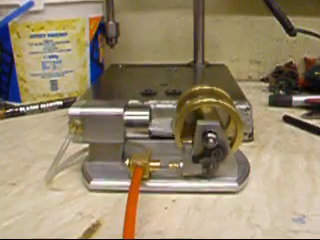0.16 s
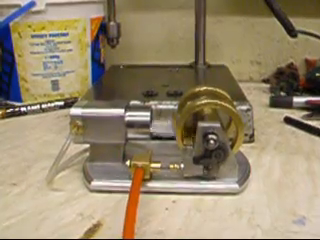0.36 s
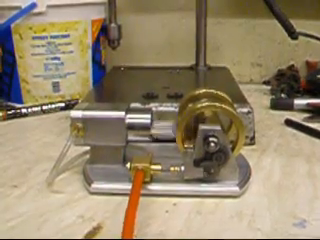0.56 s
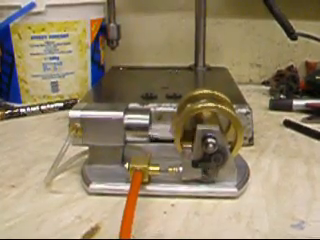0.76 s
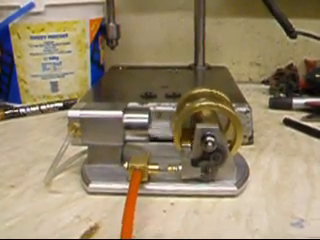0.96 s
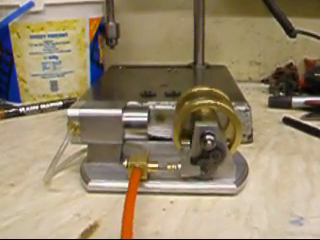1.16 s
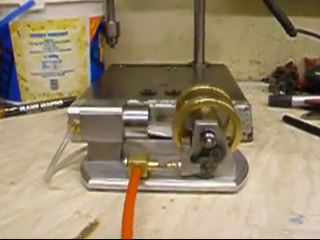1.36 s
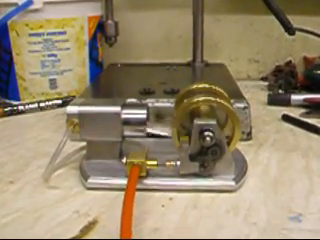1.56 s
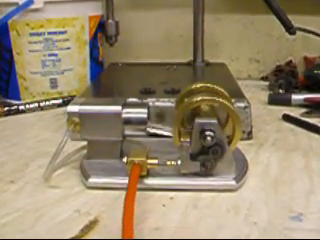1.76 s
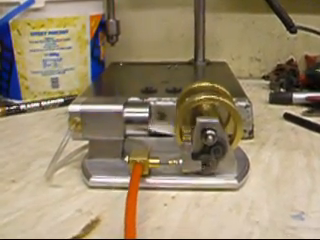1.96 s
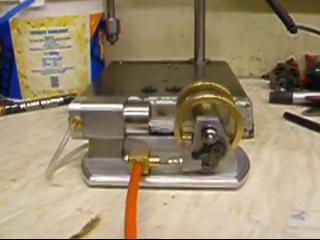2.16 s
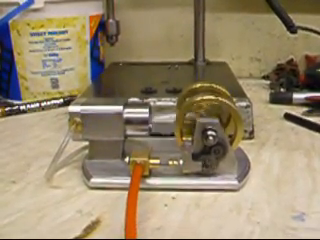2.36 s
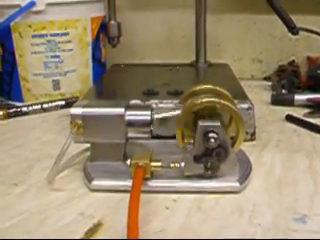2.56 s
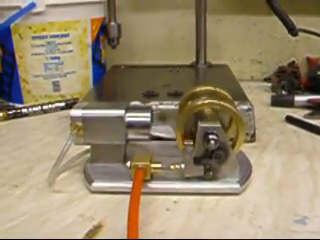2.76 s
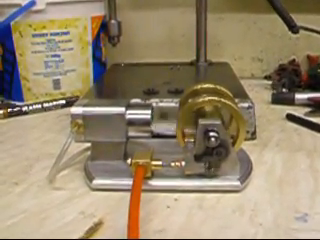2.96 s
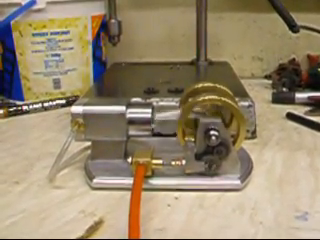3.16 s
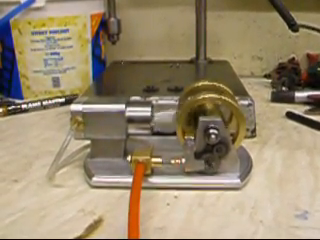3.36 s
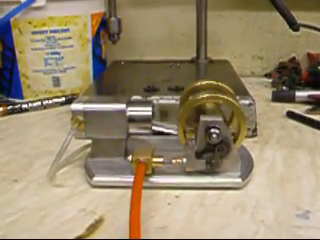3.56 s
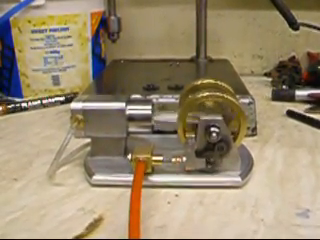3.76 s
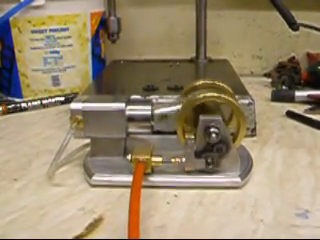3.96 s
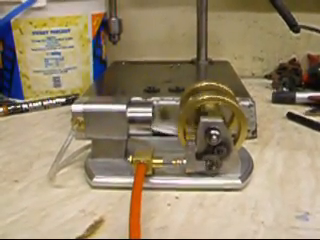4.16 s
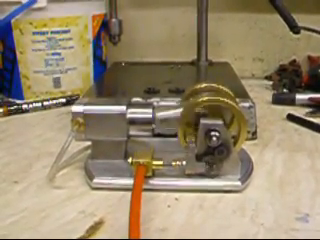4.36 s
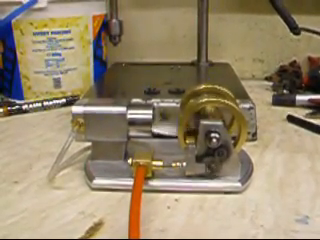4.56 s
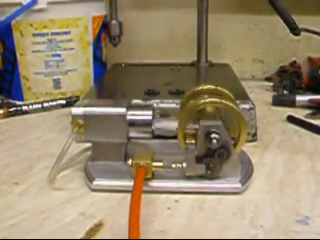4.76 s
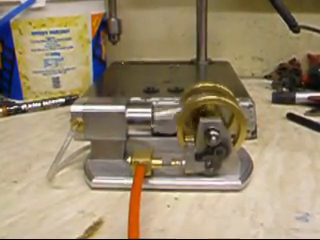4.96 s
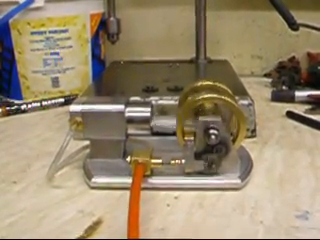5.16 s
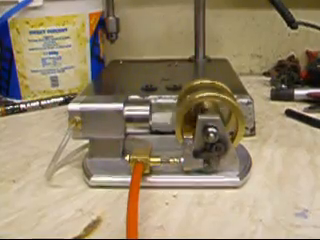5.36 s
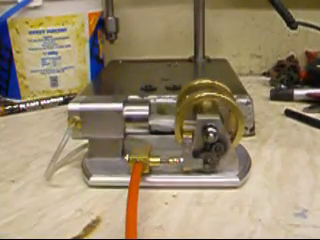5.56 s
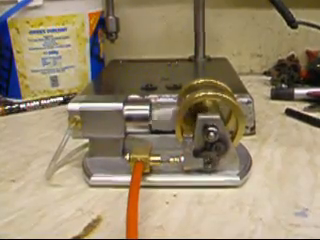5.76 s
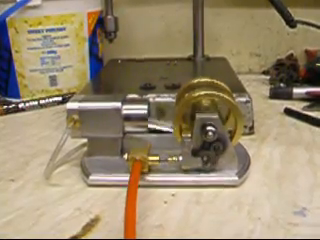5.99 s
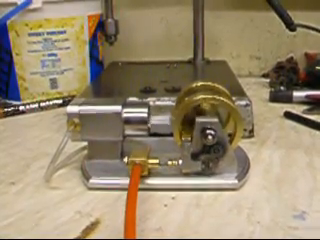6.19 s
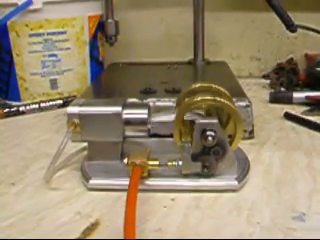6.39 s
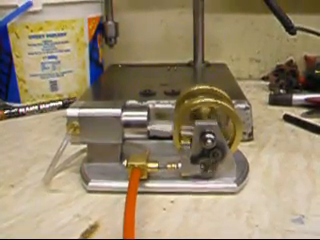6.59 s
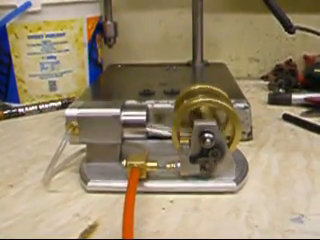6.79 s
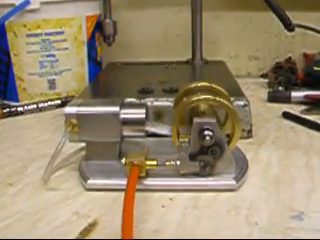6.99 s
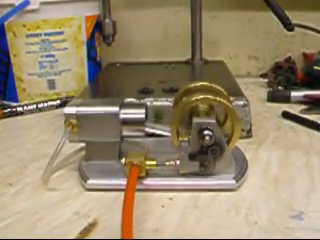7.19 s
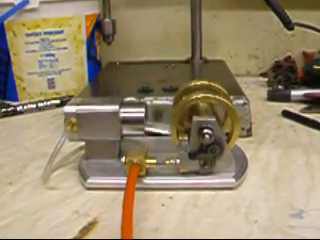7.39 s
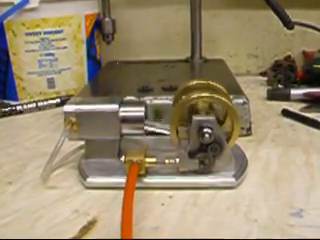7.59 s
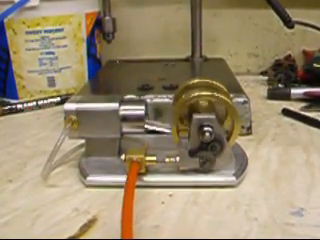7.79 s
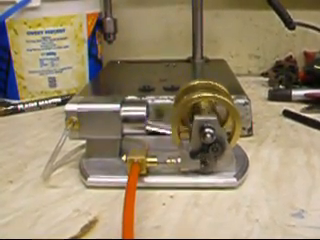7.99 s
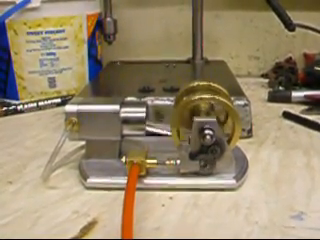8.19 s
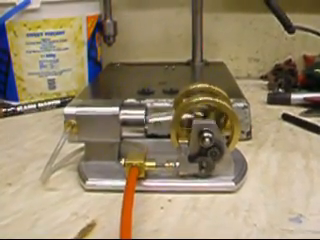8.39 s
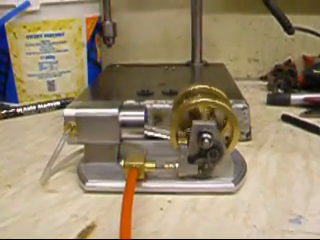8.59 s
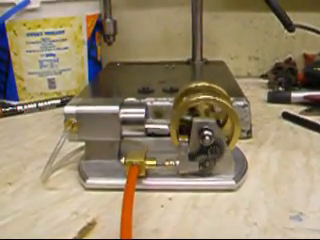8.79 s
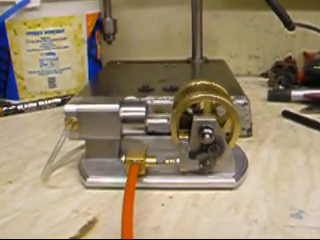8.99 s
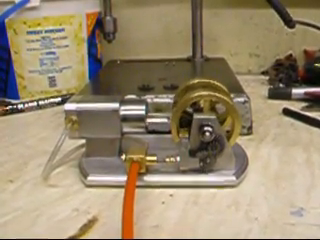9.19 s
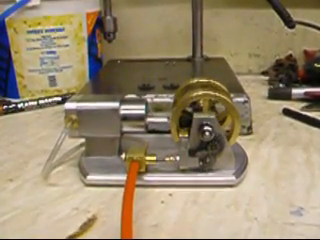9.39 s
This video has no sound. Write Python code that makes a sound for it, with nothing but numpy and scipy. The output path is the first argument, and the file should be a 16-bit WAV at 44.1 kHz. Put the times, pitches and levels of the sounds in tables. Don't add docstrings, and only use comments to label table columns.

```python
import sys
import numpy as np
from scipy import signal
from scipy.fft import rfft, irfft
from scipy.io import wavfile
from scipy.ndimage import uniform_filter1d, map_coordinates

SR = 44100
rng = np.random.default_rng(int(sys.argv[2]) if len(sys.argv) > 2 else 0)


def generate_wav(sig):
    pcm = np.round(np.clip(np.atleast_2d(sig).T, -1, 1) * 32767).astype(np.int16)
    wavfile.write(sys.argv[1], SR, pcm)


def decibels_to_gain(level_db):
    exponent = np.asarray(level_db, float) / 20
    return 10 ** exponent


N = 416304

# port_opens_s, burst_db, jet_db, sag_db (over the stroke)
RUNNING_STROKES = [(0.084, -18, -26.5, 9), (0.283, -21, -24, 5.5), (0.4822, -19, -24.5, 7.5),
                   (0.6819, -18.5, -24, 0), (0.8834, -19.5, -25.5, 6), (1.084, -19.5, -21, 3.5),
                   (1.2895, -17, -23.5, 6), (1.4959, -18.5, -22.5, 4.5), (1.6977, -14.5, -24, 4),
                   (1.9066, -15.5, -22.5, 4), (2.1166, -16, -28, 9.5), (2.3343, -19, -22.5, 2.5),
                   (2.5532, -19.5, -23, 3.5), (2.7858, -17, -24.5, 4), (3.0145, -17.5, -24, 3),
                   (3.2424, -18, -22, 1.5), (3.4734, -19, -23.5, 2), (3.7147, -17.5, -23.5, 4.5)]
# port_opens_s, burst_db, jet_db, sag_db
SLOWING_STROKES = [(3.951, -19.5, -24, 3.5), (4.202, -17, -24, 5.5), (4.4468, -19.5, -24, 3.5),
                   (4.6997, -20, -23.5, 2), (4.951, -18, -23.5, 8), (5.2141, -19, -23.5, 0.5),
                   (5.4785, -18.5, -23, 8), (5.7535, -17, -22, 2.5), (6.0188, -17, -24.5, 4),
                   (6.3156, -22.5, -23.5, 2), (6.6313, -17, -25, 2), (7.0083, -19, -23, 1),
                   (7.383, -17, -25.5, 4), (7.7915, -21, -22.5, 3), (8.171, -15.5, -26, 7.5)]
# time_s, level_db
SUPPLY_PRESSURE = [
    (0, 1.5),
    (2.5, -1),
    (5, -5),
    (6.5, -7),
    (8.4, -16.5),
]
# centre_hz, width_hz, boost_db
LEAK_RESONANCES = [(2200, 310, 2), (3465, 100, 8), (3830, 110, 7.5), (4495, 320, 7), (5610, 220, 2),
                   (5930, 250, 2.5)]


def unit(x):
    return x / np.sqrt(np.mean(x ** 2) + 1e-20)


def along(points, hz):
    f, v = np.transpose(points)
    return np.interp(np.log(hz + 1), np.log(f + 1), v)


def wobble(rate):
    knots = rng.standard_normal(int(N * rate / SR) + 4)
    return map_coordinates(knots, [np.arange(N) * rate / SR])


def bumps(modes, hz):
    return decibels_to_gain(sum(db / (1 + (2 * (hz - centre) / width) ** 2) for centre, width, db in modes))


def coloured(x, gain):
    size = 8192
    cepstrum = irfft(np.log(gain(np.fft.rfftfreq(size, 1 / SR)) + 1e-6), size)
    cepstrum[1:size // 2] *= 2
    cepstrum[size // 2 + 1:] = 0
    response = irfft(np.exp(rfft(cepstrum)), size)[:size // 2]
    return signal.fftconvolve(x, response / np.linalg.norm(response))[:len(x)]


def patchy(x, depth_db, size):
    z = signal.stft(x, nperseg=256)[2]
    field = uniform_filter1d(rng.standard_normal(z.shape), size=4, axis=0)
    field = uniform_filter1d(field, size=size, axis=1)
    return signal.istft(z * decibels_to_gain(depth_db * unit(field)), nperseg=256)[1][:N]


def strokes():
    opens, *levels_db = np.transpose(RUNNING_STROKES + SLOWING_STROKES)
    turn_s = np.diff(opens, prepend=2 * opens[0] - opens[1])
    open_s = .018 + .14 * turn_s
    return opens, open_s, *levels_db


def crank():
    opens = strokes()[0]
    opens = np.r_[2 * opens[0] - opens[1], opens, opens[-1] + .42]
    return np.interp(np.arange(N) / SR, opens, np.arange(len(opens)), right=.7)


def hiss():
    # pitch_hz, level_db (per Hz)
    hiss_colour = [(18, -22), (30, -1.5), (50, -9), (200, -10.5), (400, -10.5), (900, -11), (1500, -11.5),
                   (3000, -11), (5000, -13.5), (7000, -15.5), (8000, -14), (9500, -21.5), (11500, -25.5),
                   (13300, -32)]
    # pitch_hz, level_db
    mains_hum = [
        (60, -76),
        (180, -73.5),
    ]
    level_db = -50.5 + .4 * wobble(1.17) + 0.41 * wobble(7.1)
    air = coloured(rng.standard_normal(N),
                   lambda hz: decibels_to_gain(along(hiss_colour, hz)) * bumps(LEAK_RESONANCES, hz) ** 0.92)
    hum = sum(decibels_to_gain(db) * np.sin(2 * np.pi * hz * np.arange(N) / SR) for hz, db in mains_hum)
    return decibels_to_gain(level_db) * air + hum


def seepage():
    # pitch_hz, level_db (per Hz)
    seep_colour = [(300, -37), (1000, -11), (2000, -8.5), (3500, -5), (4600, -8.5), (6000, -9), (8000, -8),
                   (11000, -18.5), (13400, -20)]
    # crank_turn (0-1 from port opening), width_turns, level_db
    valve_leaks = [
        (.1, .12, -32),
        (.35, 0.042, -42.5),
        (.495, 0.033, -48.5),
        (.58, 0.066, -51),
        (.84, 0.058, -46),
        (.97, 0.019, -47.5),
    ]
    turn = crank() % 1
    leak = sum(decibels_to_gain(db - 5.9 * ((turn - at) / width) ** 2) for at, width, db in valve_leaks)
    pressure_db = np.interp(np.arange(N) / SR, *np.transpose(SUPPLY_PRESSURE))
    flutter_db = 1.6 * wobble(9.6) + 0.52 * wobble(60) + 1.4 * wobble(300)
    air = leak * decibels_to_gain(pressure_db + flutter_db) * rng.standard_normal(N)
    air = coloured(air, lambda hz: decibels_to_gain(along(seep_colour, hz)) * bumps(LEAK_RESONANCES, hz) ** 1.23)
    return patchy(air, depth_db=1.5, size=14)


def exhaust():
    # pitch_hz, level_db (per Hz)
    jet_colour = [(90, -31), (250, -28), (600, -15), (1100, -13), (1450, -22.5), (2000, -8), (3300, -2),
                  (4100, -12), (6300, -13.5), (8000, -15.5), (10000, -21.5), (11800, -27.5), (12800, -23),
                  (13400, -28)]
    # centre_hz, width_hz, boost_db
    body_modes = [(150, 30, 10), (311, 33, 7), (550, 33, -13), (588, 33, -11), (688, 35, -8), (995, 35, -8),
                  (1670, 70, 3.5), (1895, 58, -5), (2168, 40, -8.5), (2365, 110, -7.5), (2455, 35, -7),
                  (2685, 38, -8), (2775, 35, -8.7), (2930, 60, -11), (3330, 42, -9), (3570, 190, 3.2),
                  (4012, 35, -9.5), (4165, 42, -11.5), (4325, 40, -6.2), (4775, 36, -8), (5030, 100, -9.5),
                  (5192, 60, -6), (5960, 95, -5), (6290, 200, 4.5), (7795, 60, -7), (8215, 58, -7),
                  (9670, 260, 3.5), (10950, 100, -8), (11850, 70, -8), (13050, 35, -8.9)]
    # centre_hz, width_hz, boost_db
    hose_modes = [(150, 21, 14), (334, 104, 9), (469, 55, 13), (629.6, 32, 16)]
    gate, flow = np.zeros(N), np.zeros(N)
    t = np.arange(-SR // 20, SR // 5) / SR
    luck = rng.standard_normal((len(RUNNING_STROKES + SLOWING_STROKES), 4))
    for s, length, blow_db, jet_db, sag_db, (*surge, puff) in zip(*strokes(), luck):
        surge_db = 0.5 * (surge - np.mean(surge))
        early_db, middle_db, late_db = jet_db + sag_db * np.array([.45, -.1, -.55]) + surge_db
        level_db = np.interp(t, [.004, .009, length * 0.28, length * 0.35, length * 1.04],
                             [blow_db - 1.5, early_db + 0.69, early_db, middle_db, late_db])
        crack = np.clip((t - .0013) / .0014, 0, 1) ** 1.5
        lead_in = decibels_to_gain(-20.5 + 1600 * np.minimum(t, 0)) * (t < .002)
        closing = decibels_to_gain(-1600 * np.maximum(t - length + 0.0056, 0))
        start = round(s * SR) - SR // 20
        gate[start:][:len(t)] += decibels_to_gain(level_db) * (crack + lead_in) * closing
        push = np.clip(t / (length * 0.65), 0, 1) ** 0.33 * closing
        hose_db = -49 + 1.5 * puff
        flow[start:][:len(t)] += decibels_to_gain(hose_db + 0.2) * push

    shocks = decibels_to_gain(3.75 * np.minimum(wobble(2500), 1.6))

    def torn_air(grip):
        return unit(shocks ** grip * decibels_to_gain(1.54 * wobble(240)) * rng.standard_normal(N))

    def roar_share(hz):
        return 1 / (1 + (hz / 4300) ** 6)

    def colour(hz):
        return decibels_to_gain(along(jet_colour, hz)) * bumps(body_modes, hz) ** 1.17 / (1 + (450 / (hz + 1)) ** 3)

    roar = coloured(gate * torn_air(1.05), lambda hz: colour(hz) * np.sqrt(roar_share(hz)))
    fizz = coloured(gate * torn_air(.7), lambda hz: colour(hz) * np.sqrt(1 - roar_share(hz)))
    hose = coloured(flow * rng.standard_normal(N),
                    lambda hz: bumps(hose_modes, hz) * hz / (hz + 150) / (1 + (hz / 600) ** 4))
    jet = patchy(decibels_to_gain(-0.92) * roar + decibels_to_gain(-7.0) * fizz, depth_db=2.0, size=6)
    return jet + hose, gate


def ring(modes, rise, scatter_db):
    t = np.arange(SR // 20) / SR
    luck = rng.standard_normal((len(modes), 2))
    tones = np.zeros(len(t))
    for (hz, db, t60), (strength, detune) in zip(modes, luck):
        decay = decibels_to_gain(db + scatter_db * strength - 60 * t / t60)
        tones += decay * np.sin(2 * np.pi * hz * (1 + 0.011 * detune) * t)
    return tones * (1 - np.exp(-(t / rise) ** 2))


def valve():
    # pitch_hz, level_db, t60_s
    pop_modes = [(1128, -22.5, 0.035), (2000, -0.5, 0.0094), (2910, 2.5, 0.0076), (3543, -1, 0.018),
                 (4700, -15.5, 0.042), (5390, -12.5, 0.015), (6340, -15, 0.031), (10000, -28, .02),
                 (10540, -34, 0.013), (12500, -22, .015)]
    # pitch_hz, level_db, t60_s
    seat_modes = [(2320, -3, 0.016), (1840, -6.5, 0.019), (3470, -26, 0.013)]
    out = np.zeros(N)
    for s, length, blow_db, jet_db, sag_db in zip(*strokes()):
        burst = round((s + .0008) * SR)
        pop = ring(pop_modes, rise=0.00075, scatter_db=2.0)
        out[burst:][:SR // 20] += decibels_to_gain(blow_db + 3.0) * pop
        shut = round((s + 1.12 * length - .007) * SR)
        tap_db = jet_db - 0.33 * sag_db + 2 + 120 * (length - 0.1)
        out[shut:][:SR // 20] += decibels_to_gain(tap_db) * ring(seat_modes, rise=0.00066, scatter_db=4.5)
    return out


def glint(gate):
    hz, t, z = signal.stft(rng.standard_normal(N), SR, nperseg=1024)
    flicker = decibels_to_gain(10.0 * rng.standard_normal((len(hz) // 3 + 1, len(t))))
    flicker = flicker.repeat(3, axis=0)[:len(hz)]
    pair = decibels_to_gain(-((hz - 15250) / 60) ** 2) + decibels_to_gain(-((hz - 15620) / 70) ** 2)
    air = signal.istft(z * flicker * pair[:, None], SR, nperseg=1024)[1][:N]
    level = decibels_to_gain(-40 + 4.5 * wobble(7)) * (wobble(25) > -.5)
    return level * uniform_filter1d(gate, size=600) * unit(air)


def room(x):
    # pitch_hz, t60_s
    room_decay = [
        (200, 0.41),
        (2000, 0.3),
        (10000, 0.21),
    ]
    opens = strokes()[0]
    edges = np.r_[0, np.round(opens[1:] * SR).astype(int) - 400, N]
    hz, t, z = signal.stft(rng.standard_normal((len(opens), SR // 3)), SR, nperseg=256)
    beaming = bumps([(3600, 1300, -6.5)], hz)[:, None]
    z = z * (beaming * decibels_to_gain(-60 * t / along(room_decay, hz)[:, None]))
    tails = signal.istft(z, SR, nperseg=256)[1]
    out = np.zeros(N + SR)
    for start, end, tail in zip(edges, edges[1:], tails):
        answer = signal.fftconvolve(x[start:end], tail / np.linalg.norm(tail))
        out[start + 300:][:len(answer)] += answer
    return out[:N]


def linkage():
    # centre_hz, width_hz, boost_db
    knock_modes = [(1590, 460, 19), (2520, 400, 15), (3500, 300, 14)]
    blows = np.diff(np.floor(crank() - .48), prepend=0) == 1
    pressure_db = np.interp(np.arange(N) / SR, *np.transpose(SUPPLY_PRESSURE))
    strength = decibels_to_gain(pressure_db + 1.7 * wobble(5.5))
    knock = coloured(blows * strength,
                     lambda hz: bumps(knock_modes, hz) * hz / (hz + 900) / (1 + (hz / 4000) ** 4))
    return decibels_to_gain(-24.5) * knock


def scene():
    jet, gate = exhaust()
    near = jet + valve() + linkage()
    echo = decibels_to_gain(-11.5) * patchy(room(near), depth_db=2.0, size=14)
    air = near + echo + seepage() + hiss()
    hz, t, z = signal.stft(air, SR, nperseg=1024)
    lift_hz = 5500 * np.interp(t, np.arange(N) / SR, uniform_filter1d(gate, size=1500)) - 480
    edge_hz = 13500 + 280 * rng.standard_normal(len(t)) + lift_hz
    heard = signal.istft(z * (hz[:, None] < edge_hz), SR, nperseg=1024)[1][:N]
    return (heard + glint(gate))[None]


def band_limit(x):
    return signal.sosfilt(signal.butter(12, 16020, fs=SR, output="sos"), x)


def record(dry):
    mix = dry + .0035
    return band_limit(mix)


dry = scene()
out = record(dry)
generate_wav(out)
```